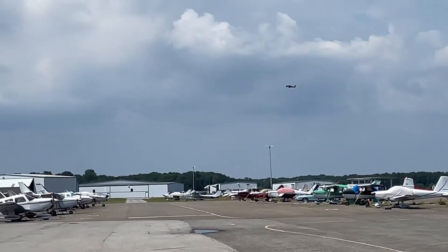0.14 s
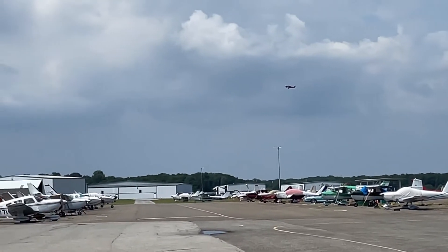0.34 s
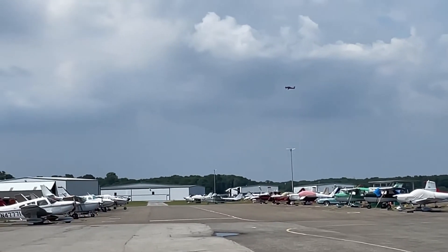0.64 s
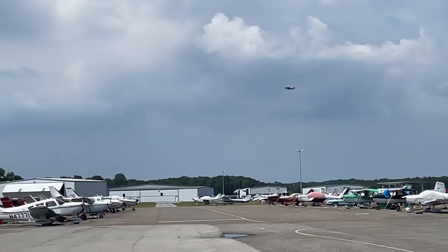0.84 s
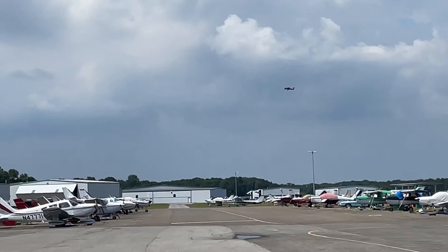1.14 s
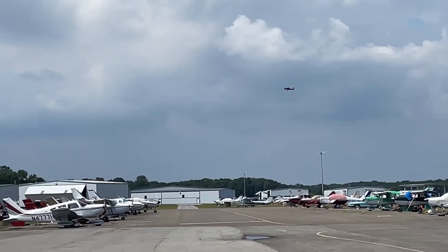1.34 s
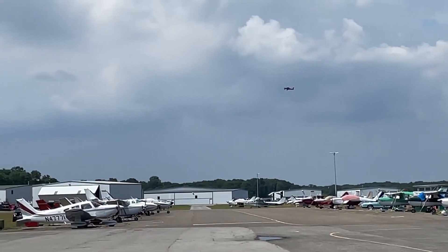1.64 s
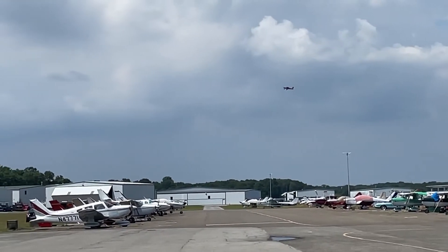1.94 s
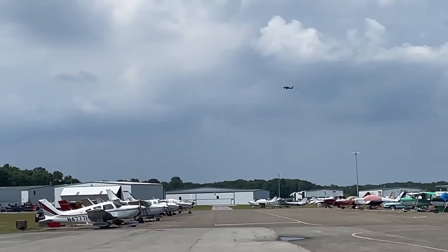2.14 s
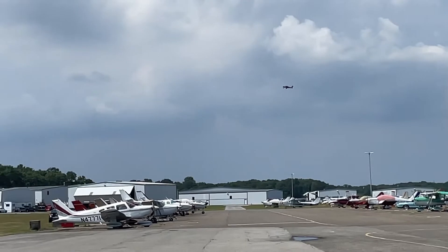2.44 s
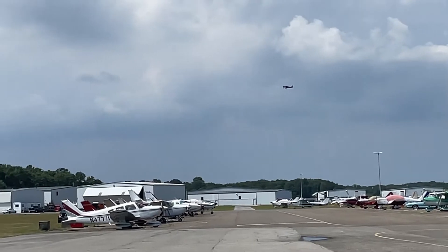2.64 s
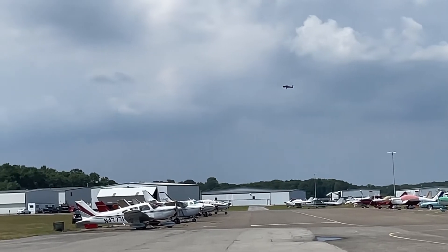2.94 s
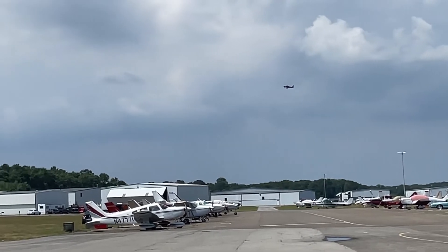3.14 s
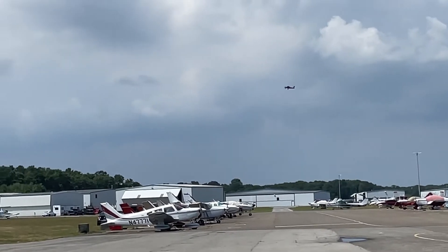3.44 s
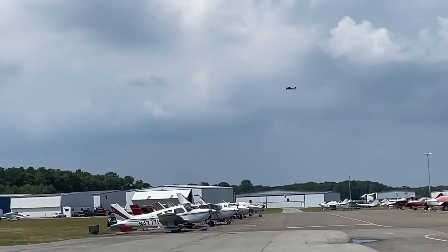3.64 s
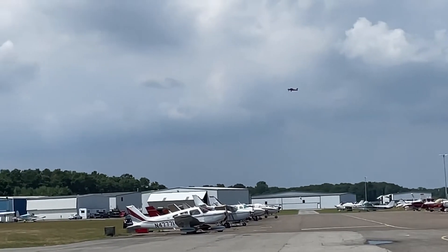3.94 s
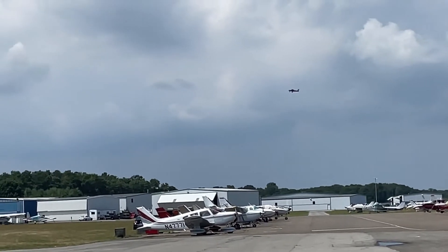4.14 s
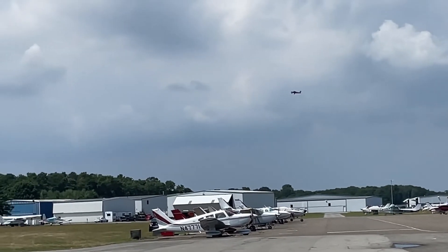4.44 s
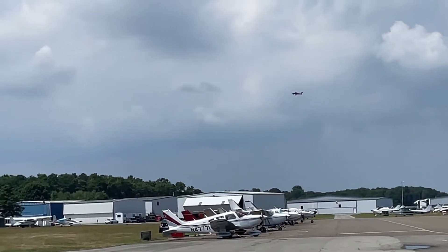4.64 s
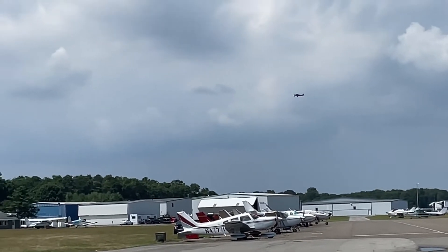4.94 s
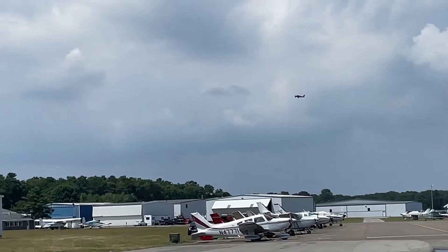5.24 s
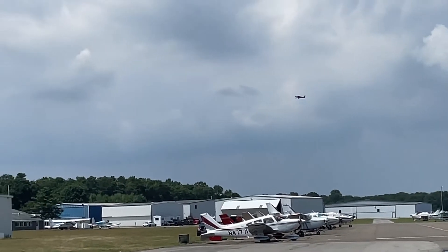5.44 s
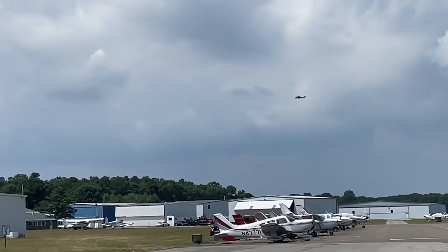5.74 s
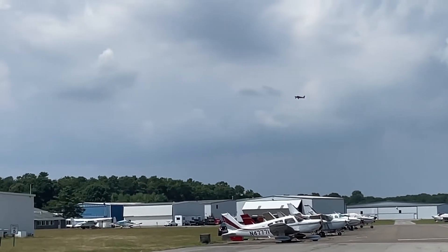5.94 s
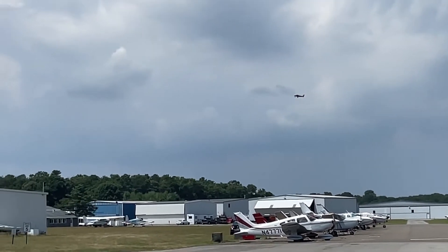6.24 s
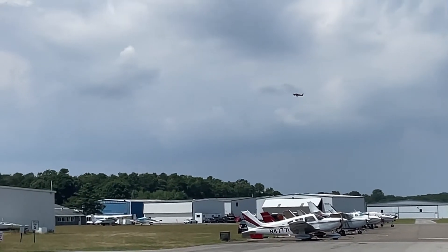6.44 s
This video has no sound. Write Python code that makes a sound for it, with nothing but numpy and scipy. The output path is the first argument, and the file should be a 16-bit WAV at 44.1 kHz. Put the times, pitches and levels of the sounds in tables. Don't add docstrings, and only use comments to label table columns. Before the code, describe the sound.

Heavy wind rumbles and slaps a handheld phone microphone while a distant propeller plane drones and two parked light aircraft idle with rough puttering hiss.

```python
import sys
import numpy as np
from scipy import signal
from scipy.fft import rfft, irfft, next_fast_len
from scipy.io import wavfile
from scipy.ndimage import uniform_filter1d

SR = 44100
rng = np.random.default_rng(int(sys.argv[2]) if len(sys.argv) > 2 else 0)


def volts_from_decibels(level):
    exponent = np.asarray(level, float) / 20
    return 10 ** exponent


def wrap_up_sound(samples):
    columns = np.atleast_2d(samples).T
    tamed = np.clip(columns, -1, 1)
    steps = np.round(tamed * 32767).astype(np.int16)
    wavfile.write(sys.argv[1], SR, steps)


N = 290178
TIME = np.arange(N) / SR
HZ = np.maximum(np.fft.rfftfreq(N, 1 / SR), 1)
SIDES = np.array([[1], [-1]])

# start_s, near_hz, far_hz
IDLE = [(0, 59.1, 43.6), (1.0, 59.3, 43.9), (2.2, 59.4, 44.5), (3.1, 59.55, 44.8), (4.0, 59.33, 45.1),
        (5.0, 59.2, 44.8), (6.58, 59.2, 45.3)]


def columns(table, at):
    first, *rest = np.transpose(table)
    return [np.interp(at, first, c) for c in rest]


def unit(x):
    return x / np.sqrt(np.mean(x ** 2))


def colour(x, points):
    hz, db = np.transpose(points)
    outside_oct = np.abs(np.log2(HZ / np.clip(HZ, hz[0], hz[-1])))
    gain_db = np.interp(np.log(HZ), np.log(hz), db) - 60 * outside_oct
    return irfft(rfft(x) * volts_from_decibels(gain_db), N)


def lowpass(x, corner_hz):
    return irfft(rfft(x) / (1 + (HZ / corner_hz) ** 4), N)


def walk(rate_hz):
    k = int(SR / rate_hz)
    levels = np.repeat(rng.standard_normal(size=1024)[:N // k + 1], k)[:N]
    return unit(uniform_filter1d(uniform_filter1d(levels, k), k))


def patchy(points, gate, flicker_db, rate_hz, count=6):
    edges_hz = np.geomspace(points[0][0] / 2, points[-1][0] * 2, count + 1)
    white = rfft(rng.standard_normal(N))
    total = 0
    for lo, hi in zip(edges_hz, edges_hz[1:]):
        band = irfft(white * ((HZ >= lo) & (HZ < hi)), N)
        total = total + band * volts_from_decibels(flicker_db * walk(rate_hz))
    return unit(colour(total * gate, points))


def steady(x, seconds):
    k = int(seconds * SR)
    return unit(x / np.sqrt(uniform_filter1d(uniform_filter1d(x ** 2, k), k) + 0.045))


def blow():
    # start_s, level_db, tilt_db
    breeze = [(0, -27, -12), (0.5, -25, -5), (0.9, -25, -5.5), (1.05, -21.5, -6.5), (1.44, -24.5, 1),
              (1.49, -33, 1.5), (1.75, -37, -4), (2.4, -31, 3), (3.1, -32.5, 1), (3.45, -27.5, 7),
              (3.75, -31.5, 2), (4.2, -31, 4), (4.75, -34.5, 5.5), (5.2, -28, 4), (5.75, -29.5, 7.5),
              (5.88, -35.5, -3.5), (6.2, -32, 9.5), (6.58, -33, 3)]
    # centre_s, level_db, length_ms, tilt_db
    gusts = [(0.239, -14, 34, -29), (0.31, -17.5, 18, -20), (0.384, -13.5, 28, -14),
             (0.601, -18.5, 97, -5.5), (0.69, -19, 125, -14), (0.858, -21, 38, -7), (0.955, -15, 34.5, 6),
             (1.1, -24, 56, -31), (1.21, -17.5, 83, -10), (1.34, -19, 150, -9), (1.39, -18.5, 50, 0),
             (1.449, -13.5, 12, 1), (1.999, -28, 27, -2), (2.14, -26.5, 100, -13), (2.25, -30, 180, 4),
             (2.819, -25, 45, 7), (3.166, -21, 51, -9), (3.549, -31, 56, 14.5), (3.623, -27, 210, 8),
             (3.847, -19, 86, 7.5), (4.287, -21, 39, 9), (4.356, -30, 74, 13), (4.43, -21.5, 85, -2),
             (4.913, -23, 69, 4), (5.301, -29, 86, 7.5), (5.5, -40, 144, 15.5), (5.61, -34, 34, -1),
             (6.1, -27, 46, 8), (6.285, -19, 58, 7.5), (6.47, -25.5, 67, -1)]
    # centre_s, level_db, length_ms
    surges = [(0.02, -16, 19), (0.17, -22.5, 36), (0.46, -19, 30), (0.781, -21, 88), (1.83, -26, 74),
              (2.75, -48, 20), (3.51, -24, 34), (3.61, -30, 33), (3.875, -31, 31), (4.04, -27, 63),
              (4.38, -30, 35), (4.44, -33, 43), (5.05, -28, 200), (5.48, -21, 51), (5.75, -26, 71),
              (6.26, -26.5, 192), (6.43, -27, 71)]
    # rumble_db, flutter_db, edge_db
    tilt_shares = (-0.068, 0.71, 1.86)
    # rumble_db, flutter_db, edge_db
    band_trims = (-1.5, -2, -13.5)
    surge_tilt_db = -15.5
    rise, fall = 0.37, 0.4
    lag_ms_db = 1.5
    level_db, tilt_db = columns(breeze, TIME)
    power = [volts_from_decibels(2 * (level_db + share * tilt_db)) for share in tilt_shares]
    for s, db, ms, tilt in gusts + [(*row, surge_tilt_db) for row in surges]:
        lag_s = lag_ms_db * max(tilt, 0) / 1000
        for band, share in enumerate(tilt_shares):
            age = (TIME - s - lag_s * (1 - band / 2)) / (ms / 1000)
            shape = np.exp(-2 * (age / np.where(age < 0, rise, fall)) ** 2)
            power[band] = power[band] + shape * volts_from_decibels(2 * (db + share * tilt))
    return [10 * np.log10(p) + db for p, db in zip(power, band_trims)]


def slaps():
    # start_s, peak_db, bass_over_edge_db, fall_db_per_octave
    sharp_eddies = [(0.234, -28, 2, -22), (0.948, -18.5, 11, -12), (0.957, -19, 16, -13),
                    (1.392, -39, 18, -26), (1.446, -29, 22.5, -12), (2.009, -33.5, 16, -22.5),
                    (2.172, -33, 11, -8), (3.396, -18, 6, -16), (3.457, -17, 2.5, -27),
                    (3.478, -30, 9, -19), (3.637, -23, 3, -14), (3.708, -32, 0, -14),
                    (3.853, -15, 12.5, -6), (4.742, -23.5, -4, -27), (5.752, -22, 1, -3),
                    (3.519, -25, 11, -17.5), (3.533, -15.5, -21, -9), (3.554, -13, -9, -9.5),
                    (3.575, -15.5, -6, -7.5), (3.622, -17.5, 3, -10), (3.845, -18, 11, -16),
                    (3.869, -22, -4, -8), (3.902, -22.5, 9, -12), (4.262, -27.5, 15.5, -27),
                    (4.285, -13.5, 10.5, -4.5), (4.32, -20, 0.5, -17), (4.343, -15, 6.5, -7),
                    (4.414, -24, 0, -14), (4.913, -17.5, -12, -19), (5.293, -31.5, 16, -4.5),
                    (5.498, -20, -18, -9), (5.536, -22, -6, -14), (5.610, -16, -3, -9),
                    (5.632, -20, 2, -15), (5.655, -21.5, 12.5, -1.5), (5.741, -20, 7, -8),
                    (5.776, -20.5, -6, -9), (6.282, -13.5, 2, -6.5), (6.301, -18.5, 5, -12),
                    (6.371, -26, 6, -18), (6.465, -17.5, -6, -11)]
    # start_s, peak_db, length_ms
    puffs = [(0.303, -27.5, 4.4), (0.331, -25.5, 11.3), (0.57, -33.5, 8.4), (0.841, -30.5, 6),
             (0.988, -31, 9.2), (1.209, -29, 6.9), (1.238, -27, 11), (2.581, -27.5, 14.4), (2.696, -28, 13),
             (2.808, -22, 13.1), (2.881, -30, 7.8), (3.147, -32, 4), (3.169, -27, 10.4), (3.76, -28, 5.3),
             (3.826, -21, 4.7), (4.429, -27.5, 22.4), (4.898, -41, 5.5), (5.029, -29.5, 10.8),
             (5.304, -27, 4.6), (5.48, -24, 8), (5.697, -23, 7.3), (5.757, -33.5, 22.5), (6.091, -33, 6.3),
             (6.328, -28, 4.8), (6.542, -30, 5.1), (3.915, -24, 14), (3.864, -28, 8), (2.25, -32.5, 9.04),
             (1.822, -35, 10), (5.715, -30, 10), (5.795, -31.5, 10), (6.21, -34, 8), (0.45, -34, 8)]
    slap_ms, scatter = 4.44, 0.12
    puff_bass_db, puff_fall_db, puff_dulls_db_ms = 10, -16, 0.8
    sweep_share, rough_share = 0.42, 0.55
    top_hz, knee_hz = 1050, 280
    peak_ms = 2.573
    size = 4096
    half = size // 2
    out = np.zeros(N + SR)
    t = (np.arange(size) - half) / SR
    hz = np.maximum(np.fft.rfftfreq(size, 1 / SR), 1)

    lengths_ms = slap_ms * np.exp(scatter * rng.standard_normal(size=64))
    eddies = [(s, db, bass_db, ms, fall_db)
              for (s, db, bass_db, fall_db), ms in zip(sharp_eddies, lengths_ms)]
    eddies += [(s, db, puff_bass_db, ms, puff_fall_db - puff_dulls_db_ms * ms) for s, db, ms in puffs]

    knee = 1 / (1 + (hz / knee_hz) ** 4)
    bass_gain = knee ** 1.37 / (1 + (65 / hz) ** 4)
    edge_gain = (1 - knee) / (1 + (hz / top_hz) ** 6)
    octaves = np.log2(np.maximum(hz, 400) / 400)
    noises = rng.standard_normal(size=(72, size))
    for (s, db, bass_db, ms, fall_db), noise in zip(eddies, noises):
        age = np.maximum(t, 0) / (ms / 2000)
        rough = rfft(noise * age ** 2 * np.exp(-1.5 * age))
        rough = rough / np.sqrt(np.mean(np.abs(rough) ** 2))
        sweep_s = sweep_share * ms / 1000 / np.log(2)
        delay_turns = hz * size / SR + 2 * sweep_s * hz * (1 + np.log(top_hz / hz))
        chirp = np.exp(1j * np.pi * (2 * noise[0] - delay_turns))
        burst = chirp + rough_share * rough
        edge = irfft(burst * edge_gain * volts_from_decibels(1.29 * fall_db * octaves))
        bass = irfft(burst * bass_gain)
        shift = half + int(peak_ms * SR / 1000) - np.abs(np.diff(edge)).argmax()
        edge, bass = np.roll(edge, shift), np.roll(bass, shift)
        slap = edge / np.abs(edge).max() + volts_from_decibels(bass_db - 5.5) * bass / np.abs(bass).max()
        i = int(s * SR)
        out[i:i + size] += volts_from_decibels(db) * np.sqrt(np.hanning(size)) * slap
    return out[half:N + half]


def wind():
    # hz, db_per_hz
    rumble_colour = [(22, -27.5), (35, -16.5), (55, -2.5), (70, -4.5), (95, -2.5), (125, -8), (160, -17)]
    flutter_colour = [(90, -45), (130, 3), (200, -2), (290, -5.5), (380, -21.5)]
    edge_colour = [(220, -22.5), (310, 3), (500, -4.5), (800, -16), (1300, -33.5)]
    rumble_db, flutter_db, edge_db = blow()
    lumps = walk(38)

    def turbulence(rumble_trim_db, flutter_trim_db, edge_trim_db):
        rumble = steady(patchy(rumble_colour, 1, 0.93, 3.1, count=2), 0.11)
        rumble = rumble * volts_from_decibels(rumble_db + rumble_trim_db + 1.4 * lumps)
        flutter = steady(patchy(flutter_colour, 1, 0.4, 7.7, count=2), 0.046)
        flutter = flutter * volts_from_decibels(flutter_db + flutter_trim_db + 3.26 * lumps)
        edge = steady(patchy(edge_colour, 1, 0.98, 22.44, count=2), 0.035)
        edge = edge * volts_from_decibels(edge_db + edge_trim_db + 2.6 * lumps)
        return rumble + flutter + edge

    mid = turbulence(0.54, -3.5, -5)
    side = turbulence(-15.5, -13.5, -25.5)
    side = irfft(rfft(side) / (1 + (45 / HZ) ** 4), N)
    thump = slaps()
    late = np.roll(thump, 9)
    return mid + thump + (side + 0.5 * (thump - late)) * SIDES


def ground(x, ms, gain):
    lag = SR / 1000 * ms * (1 + 0.05 * walk(1.5))
    return x + gain * np.interp(np.arange(N) - lag, np.arange(N), x)


def swing(x, db_s, turn_s, split_hz):
    low = lowpass(x, split_hz)
    tilt_db = db_s * (TIME - turn_s) / 2
    return low * volts_from_decibels(-tilt_db) + (x - low) * volts_from_decibels(tilt_db)


def exhaust(near_turns, load_db):
    # hz, db_per_partial
    pipe_colour = [(120, 8.5), (300, 3.5), (470, 1), (540, 0), (700, -0.5), (900, -7), (1050, -14.5),
                   (1250, -20), (1700, -23.5), (2300, -36.5)]
    # centre_s, peak_db, ring_hz
    pops = [
        (1.73, -43, 3600),
        (1.84, -36, 2000),
        (1.978, -38, 2200),
        (3.474, -36.5, 1450),
        (4.569, -35, 1400),
        (4.653, -30, 1390),
    ]
    pop_ms = 2.2
    tone_db = -35.5 + 0.16 * (load_db + 44) - 0.57 * TIME
    partials = 0
    for k in range(2, 36):
        flicker = volts_from_decibels(3.1 * walk(8))
        phase = 0.14 * rng.standard_normal()
        partials = partials + flicker * np.cos(2 * np.pi * (k * near_turns + phase))
    tone = unit(colour(partials, pipe_colour)) * volts_from_decibels(tone_db)
    for s, db, hz in pops:
        age_s = TIME - s
        shape = np.exp(-0.5 * (age_s * 1000 / pop_ms) ** 2)
        tone = tone + volts_from_decibels(db) * shape * np.cos(2 * np.pi * hz * age_s)
    return tone


def rasp(near_puff, level_db):
    # hz, db_per_hz
    rasp_colour = [(500, 2), (900, 2.5), (1300, -1.5), (1600, -1.5), (1900, 0.5), (2250, -6.5),
                   (2600, -22.5), (4000, -51.5)]
    noise = patchy(rasp_colour, near_puff ** 1.28, 1.7, 8.4, count=14)
    noise = swing(noise, db_s=4, turn_s=4.14, split_hz=1940)
    return ground(noise, 2.5, 0.26) * volts_from_decibels(level_db - 1.5)


def slipstream(near_puff, far_puff, level_db):
    # hz, db_per_hz
    hiss_colour = [(190, -37.5), (320, -2), (534, -6), (591, -3.5), (689, -12), (1450, -14.5), (2440, -17),
                   (4290, -22), (6800, -28.5), (8840, -48.5), (15000, -120)]
    noise = patchy(hiss_colour, far_puff * near_puff ** 0.23, 0.9, 11, count=16)
    noise = swing(noise, db_s=-0.53, turn_s=3.9, split_hz=2200)
    return ground(noise, 1.397, 0.15) * volts_from_decibels(level_db + 7)


def top_hiss(far_puff, level_db):
    # hz, db_per_hz
    top_colour = [(6000, -1), (8000, 15), (10000, 7), (11000, 0.5), (12000, -6), (12800, -10.5),
                  (14200, -17.5), (15500, -26)]
    gate = np.roll(far_puff, 300) ** 0.78
    return patchy(top_colour, gate, 0.8, 11, count=5) * volts_from_decibels(level_db + 10)


def parked():
    # start_s, near_db, far_db, clarity_db
    apron = [(0.05, -63, -50.5, 1.5), (0.4, -57, -52, -2), (0.95, -52.5, -53.5, -3.5),
             (1.36, -47, -50, 1.5), (1.53, -57, -48, -4.5), (1.72, -52.5, -47.5, 0), (1.87, -43, -52, -1),
             (2.05, -48, -50, -4.5), (2.4, -46.5, -51.5, 0.5), (2.96, -49, -52, -6), (3.5, -43, -52, -4.5),
             (3.8, -41.5, -53.5, -4.5), (4.2, -43, -51.5, -3), (4.65, -36.5, -53.5, 0.5),
             (5.43, -42.5, -52.5, -3.5), (5.73, -39, -54.5, -3.5), (6.17, -38.5, -52.5, 2),
             (6.45, -38, -53.5, -2)]
    near, far = (np.cumsum(hz + 0.1222 * walk(4)) / SR for hz in columns(IDLE, TIME))
    near_db, far_db, clear_db = columns(apron, TIME)
    top_db = -74.5 + 0.48 * (far_db + 52) + clear_db
    top_db = top_db + 0.7 * walk(7)
    near_depth_db = 2.94 * (0.38 + 1.4 * np.tanh(walk(14)))
    near_puff = volts_from_decibels(near_depth_db * np.cos(2 * np.pi * near))
    far_depth_db = 1.28 * (1.36 + 0.35 * np.tanh(walk(6.2)))
    far_puff = volts_from_decibels(far_depth_db * np.cos(2 * np.pi * far))
    tone = exhaust(near, near_db)
    direct, diffuse = (rasp(near_puff, near_db) + slipstream(near_puff, far_puff, far_db)
                       + top_hiss(far_puff, top_db) for _ in range(2))
    return tone + direct, diffuse


def from_side(direct, diffuse):
    # hz, right_lead_turns, left_minus_right_db, unrelated_share (0-1)
    port_twist = [(60, 0, 0, .1), (250, .2, 0, .2), (520, .5, 0, .3), (900, .72, 1, .25),
                  (1150, .86, 1, .15), (1400, .95, -2, .06), (1720, 1.03, 1, .08), (1840, 1.62, 6, .2),
                  (2300, 1.8, 1, .12), (2750, 1.93, 1, .08), (3000, 2, 0, 0), (6200, 2, 0, 0),
                  (6350, 2.07, 0, .08), (7300, 2.27, 0, .04), (7650, 2.44, 0, 0), (8060, 2.5, 0, 0),
                  (8380, 2.5, 0, 0), (9200, 2.72, 0, .06), (10300, 2.87, 0, .12), (11000, 3, 0, 0),
                  (12900, 3, 0, 0), (13500, 3.45, 0, 0), (14000, 3.5, 0, 0)]
    pad = 2048
    size = next_fast_len(N + 2 * pad)
    turns, pan_db, share = columns(port_twist, np.fft.rfftfreq(size, 1 / SR))
    share = np.clip(share, 0, 1)
    direct, diffuse = (rfft(np.pad(x, pad, mode="reflect"), size) for x in (direct, diffuse))
    out = []
    for sign in (1, -1):
        mix = np.sqrt(1 - share) * direct + sign * 1j * np.sqrt(share) * diffuse
        twist = volts_from_decibels(sign * pan_db / 2) * np.exp(-sign * 1j * np.pi * turns)
        out.append(irfft(mix * twist, size)[pad:pad + N])
    return np.array(out)


def flyer():
    # start_s, pitch_hz
    blade_rate = [(0, 83.2), (1.6, 82.86), (2.8, 82.8), (4.6, 82.3), (6.58, 82.0)]
    # start_s, level_db, tilt_db_per_order
    path_fading = [(0, -51, -1.5), (.8, -57, 2), (1.3, -39, -2), (1.6, -41, 0.5), (2.0, -35.5, -0.5),
                   (2.35, -38, 2), (2.8, -39.5, -2), (3.1, -37.5, -1.5), (3.4, -35.5, -1.5), (3.9, -46, 1),
                   (4.4, -47.5, -3), (4.7, -47.5, -2.5), (5.0, -46, -1.5), (5.4, -39.5, 0.5),
                   (5.9, -40, -1.5), (6.2, -38, -0.5), (6.58, -39, 3.5)]
    # multiple, level_db
    blade_orders = [(1, -14), (2, -8), (3, -1.5), (4, 1.5), (5, -4), (6, -5.5), (7, -10.5), (8, -15.5),
                    (9, -20), (10, -22), (11, -25), (12, -28)]
    low = np.clip(TIME - 3.6, 0, 1)
    waver_hz = 0.08 + 0.2 * low
    twinkle_db = 1.1 + 2.2 * low
    turns = np.cumsum(columns(blade_rate, TIME)[0] + waver_hz * walk(5)) / SR
    level_db, tilt_db = columns(path_fading, TIME)
    tones = 0
    for k, db in blade_orders:
        gain = volts_from_decibels(db + tilt_db * (k - 6) + twinkle_db * walk(6.5))
        phase = 0.056 * rng.standard_normal()
        tones = tones + gain * np.sin(2 * np.pi * (k * turns + phase))
    return tones * volts_from_decibels(level_db - 1.5)


def drifting_band():
    # start_s, centre_hz, level_db
    band_course = [(1.55, 1992, -74), (1.8, 1994, -52), (2.2, 2090, -60), (2.5, 2060, -71), (3.3, 2057, -68),
                   (3.7, 2080, -57), (4.3, 2050, -59.5), (4.6, 1950, -53), (5.0, 1942, -57), (5.4, 1898, -58),
                   (5.75, 1964, -50), (6.1, 1988, -51.5), (6.58, 1960, -51)]
    hz, db = columns(band_course, TIME)
    slow = [lowpass(rng.standard_normal(N), 270) for _ in range(4)]
    turn = 2 * np.pi * np.cumsum(hz * (1 + 0.03 * walk(4))) / SR
    mid, side = (unit(a * np.cos(turn) + b * np.sin(turn)) for a, b in (slow[:2], slow[2:]))
    firing = np.cos(2 * np.pi * np.cumsum(columns(IDLE, TIME)[0]) / SR)
    throb_db = 3.5 * firing + 1.1 * walk(7.7)
    return (mid + 0.4 * side * SIDES) * volts_from_decibels(db + throb_db)


def scene():
    return wind() + from_side(*parked()) + flyer() * volts_from_decibels(0.4 * SIDES) + drifting_band()


def low_pass(x):
    return signal.sosfilt(signal.butter(12, 15150, fs=SR, output="sos"), x)


def record(dry):
    return low_pass(dry)


dry = scene()
out = record(dry)
wrap_up_sound(out)
```